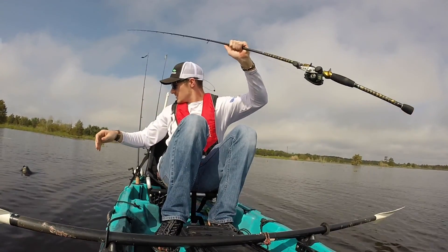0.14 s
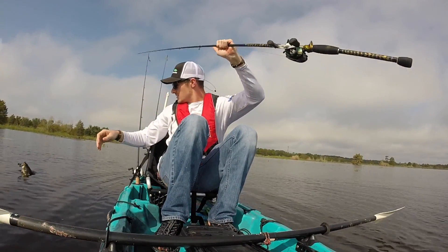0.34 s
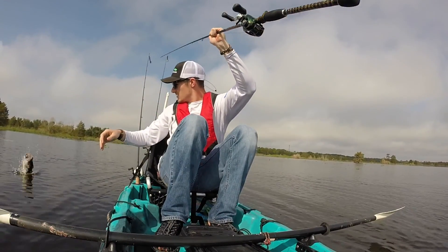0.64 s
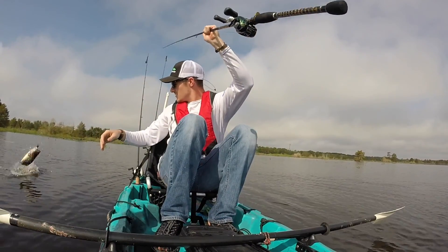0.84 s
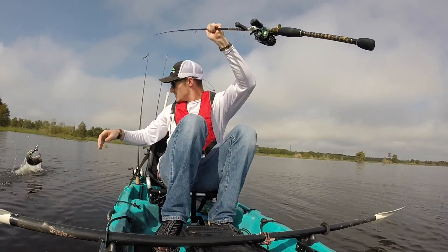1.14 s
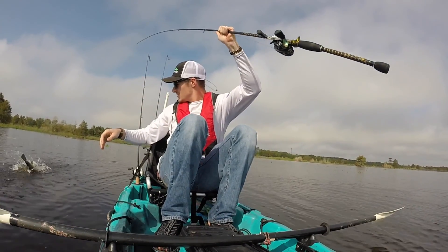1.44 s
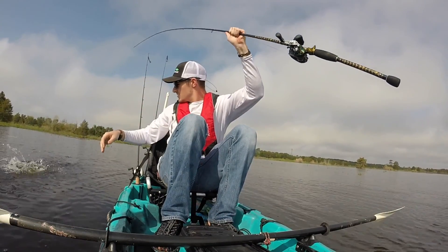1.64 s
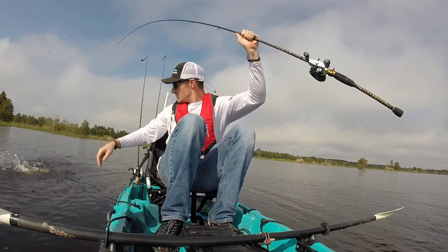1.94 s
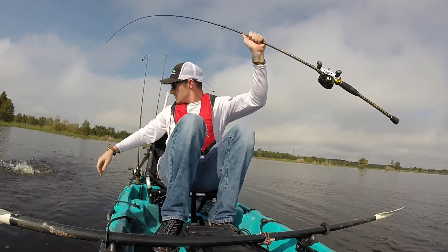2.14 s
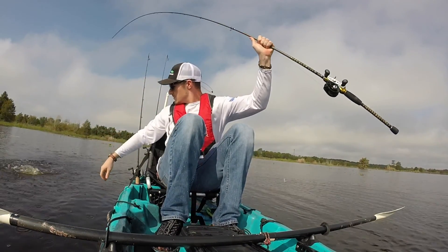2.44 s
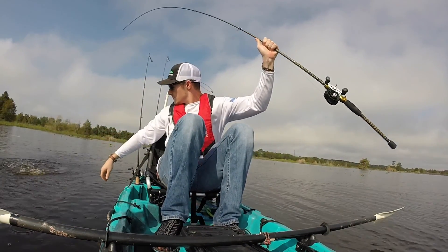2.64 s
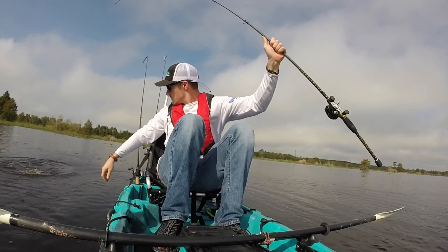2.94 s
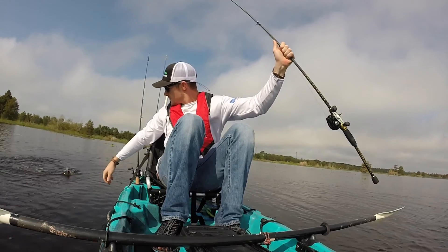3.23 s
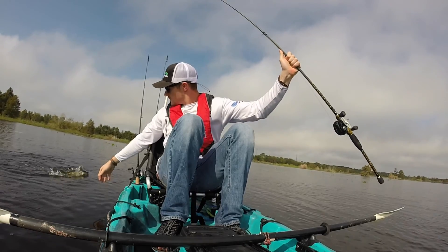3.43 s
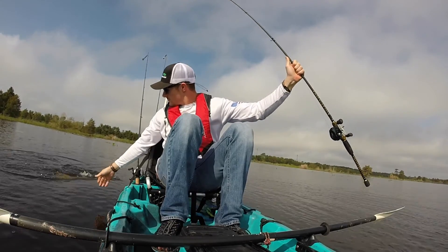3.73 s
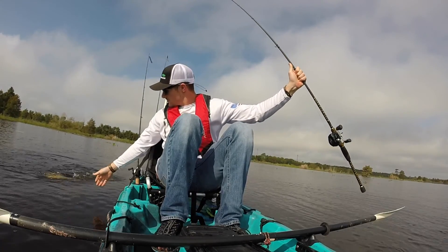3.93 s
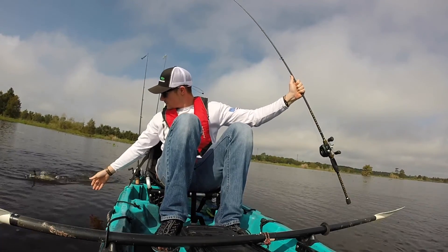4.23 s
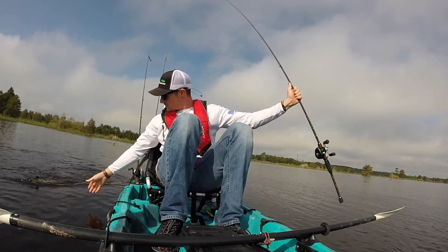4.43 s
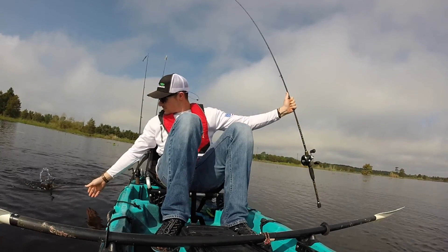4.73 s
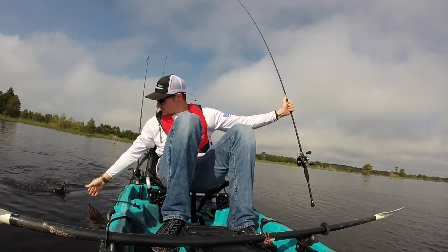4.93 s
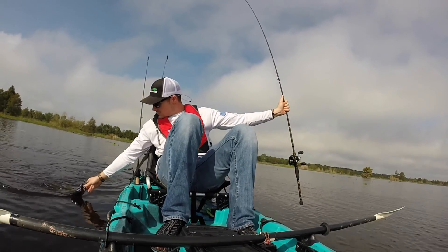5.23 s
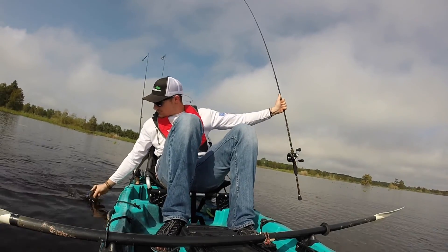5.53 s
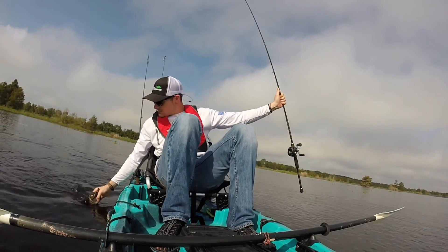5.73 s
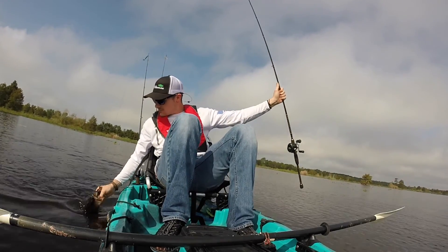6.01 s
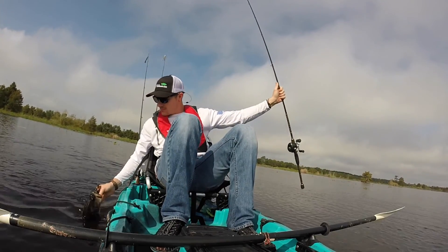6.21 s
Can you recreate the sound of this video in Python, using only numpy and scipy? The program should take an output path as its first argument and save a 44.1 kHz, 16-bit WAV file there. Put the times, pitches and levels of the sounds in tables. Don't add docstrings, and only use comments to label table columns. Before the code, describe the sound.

Outdoors on a lake, close to the water, a fish thrashes beside a small boat. First come slowed, low-pitched bloops, thumps and thick sloshing spray, strongest early and around two seconds. Afterwards, natural-speed rolling gives one sharp, hollow plop and lighter splashes, then sparse little blips. Soft lumpy wind rumble on the microphone and a thin hiss continue underneath.

```python
import sys
import numpy as np
from scipy import signal
from scipy.io import wavfile

SR = 44100
rng = np.random.default_rng(int(sys.argv[2]) if len(sys.argv) > 2 else 0)


def nominal_scale(level):
    x = np.asarray(level, float) / 20
    return 10 ** x


def bounce(signal):
    frames = np.transpose(np.atleast_2d(signal))
    limited = np.clip(frames, -1, 1)
    pcm = np.round(limited * 32767).astype(np.int16)
    wavfile.write(sys.argv[1], SR, pcm)


N = 280910
SLOW_UNTIL_S = 2.936
LENGTH = N - round(SLOW_UNTIL_S * SR / 2)



def true_s(heard_s):
    return np.where(heard_s < SLOW_UNTIL_S, heard_s / 2, heard_s - SLOW_UNTIL_S / 2)


def speed_up(heard_s):
    return 2 if heard_s < SLOW_UNTIL_S else 1


def rms_one(x):
    return x / np.sqrt(np.mean(x ** 2) + 1e-20)


def in_time(rows):
    heard_s, *columns = np.transpose(rows)
    return [np.interp(np.arange(LENGTH) / SR, true_s(heard_s), column) for column in columns]


def at_hz(points, hz):
    points_hz, values = np.transpose(points)
    return np.interp(np.log(hz), np.log(points_hz), values)


def add(out, heard_s, sound):
    i = int(true_s(heard_s) * SR)
    out[i:i + len(sound)] += sound[:LENGTH - i]


def drift(rate_hz):
    r = np.exp(-80 * np.pi * rate_hz / SR)
    white = rng.standard_normal(LENGTH // 40 + 2002)
    slow = signal.lfilter([1], [1, -2 * r, r * r], white)[2000:]
    return np.interp(np.arange(LENGTH) / 40, np.arange(len(slow)), rms_one(slow))


def resonate(x, hz, width_hz):
    r = np.exp(-np.pi * width_hz / SR)
    zeros = np.array([1, 0, -1]) * (1 - r * r) / 2
    return signal.lfilter(zeros, [1, -2 * r * np.cos(2 * np.pi * hz / SR), r * r], x)


def grains(per_s, spread_db):
    sizes = nominal_scale(spread_db * np.minimum(rng.exponential(1, LENGTH), 5))
    signs = rng.choice([-1, 1], LENGTH)
    return sizes * signs * (rng.random(LENGTH) < per_s / SR) + 1e-18


def banded_noise(spectrum, patchy_db, flicker_hz):
    out, together = 0, drift(3.0)
    edges_hz = 18 * 2 ** np.arange(0, 10.1, .5)
    white = rng.standard_normal((2, LENGTH))
    for k, (low, high) in enumerate(zip(edges_hz, edges_hz[1:])):
        sos = signal.butter(2, [low, high], "band", fs=SR, output="sos")
        band = signal.sosfilt(sos, white[k % 2])
        level_db = at_hz(spectrum, np.sqrt(low * high))
        wander_db = patchy_db * (0.61 * together + drift(flicker_hz))
        out = out + band * nominal_scale(level_db + wander_db)
    return rms_one(out)


# (frequency [Hz], density [dB per Hz])
RUMBLE_SPECTRUM = [(20, -6), (50, 4.5), (125, 6), (220, -1), (330, -14.5), (600, -41.5), (2500, -91)]
HISS_SPECTRUM = [(200, 4.5), (500, 4), (850, -3), (1250, -13.5), (2100, -11.5), (5000, -18.5),
                 (10500, -28.5), (14000, -28)]
# (time [s], swell [dB])
SWAYS = [(0.01, 7.5), (0.6, -2), (0.84, -11.5), (0.92, 7.5), (0.989, -2), (1.2, -1.5), (1.45, 1), (1.6, -5),
         (1.67, 6.5), (2.02, 5.5), (2.22, -2), (2.31, 7.5), (3.42, 5), (2.88, 0.5), (4.42, -0.5),
         (4.95, -1), (5.82, 2.5), (6.02, -4), (5.04, 1)]
RUMBLE_DB, HISS_DB, SWAY_HALF_WIDTH_S = -41.0, -51, .03


def wind():
    t = np.arange(LENGTH) / SR
    gust_db = RUMBLE_DB
    for heard_s, swell_db in SWAYS:
        gust_db = gust_db + swell_db * np.exp(-((t - true_s(heard_s)) / SWAY_HALF_WIDTH_S) ** 2)
    rumble = nominal_scale(gust_db) * banded_noise(RUMBLE_SPECTRUM, patchy_db=2.0, flicker_hz=18.5)
    return rumble + nominal_scale(HISS_DB) * banded_noise(HISS_SPECTRUM, patchy_db=.05, flicker_hz=25.0)


# (pitch [Hz], level [dB])
BUBBLE_SIZES = [(250, -10.5), (400, -10.5), (700, 0.5), (1000, -8), (1500, -12.5), (2400, -18)]


def slosh(level_db):
    clicks = grains(1800 * nominal_scale(2.5 * drift(12)), spread_db=2.8)
    size_index = rng.integers(0, 24, LENGTH)
    out = 0
    for k, hz in enumerate(np.geomspace(250, 2400, 24)):
        own_clicks = clicks * (size_index == k) + 1e-18
        rung = resonate(resonate(own_clicks, hz, hz / 7.3), hz, hz / 2.4)
        out = out + nominal_scale(at_hz(BUBBLE_SIZES, hz)) * np.sqrt(1000 / hz) * rung
    return nominal_scale(level_db) * rms_one(out)


# (time [s], peak [dB], tilt to treble [dB])
LEAP_SLAPS = [(0.4893, -34, 3), (0.5965, -28, 6), (0.6594, -42.5, -6), (0.7303, -27, 2.5), (0.746, -29, -2),
              (0.791, -39.5, -3), (0.8744, -32.5, 6), (0.8986, -18.5, -4), (0.925, -22, 7),
              (0.9794, -42, 11.5), (1.1006, -40, 7), (1.1376, -39, 10), (1.1869, -51, 11), (1.2491, -42, 9),
              (1.3414, -42.5, -11.5), (1.3565, -30, 4.5), (1.437, -33, -8), (1.643, -27, 3),
              (1.653, -24.5, 5), (1.6588, -27.5, -7), (1.7194, -40, 8), (1.737, -38, -2),
              (1.7983, -34.5, 1), (1.9555, -55.5, -20), (2.0258, -43.5, -11), (2.125, -44, -5),
              (2.1809, -44, -1), (2.296, -44, -5), (2.46, -45, -4)]
# (time [s], peak [dB])
ROLL_SLAPS = [(3.376, -38), (3.396, -34), (3.405, -34), (3.4466, -33), (3.4826, -37), (3.5344, -37),
              (3.622, -31), (3.631, -32), (3.6444, -43), (3.7212, -38), (3.583, -34), (3.66, -44),
              (3.7607, -36.5), (3.8904, -35), (3.936, -36), (4.1704, -37.5), (4.279, -36.5), (4.3216, -40),
              (4.334, -38), (4.6294, -47), (4.655, -46), (4.8, -40), (4.83, -43), (4.9432, -41),
              (5.4101, -42), (5.5698, -38)]
SLAP_LENGTH_S = 0.051


def slaps():
    dull, bright = np.zeros(LENGTH), np.zeros(LENGTH)
    t = np.arange(int(SLAP_LENGTH_S * SR))
    for heard_s, db, tilt_db in LEAP_SLAPS + [(s, db, 0) for s, db in ROLL_SLAPS]:
        onset = 1 - np.exp(-t * speed_up(heard_s) / (0.0011 * SR))
        burst = nominal_scale(db - 4.5 - 75 * t / len(t)) * onset
        add(dull, heard_s, nominal_scale(-tilt_db) * burst)
        add(bright, heard_s, nominal_scale(tilt_db) * burst)
    return dull, bright


# (frequency [Hz], width [Hz], level [dB])
LEAP_SPRAY = [(1800, 980, -4), (3352, 230, -12), (4497, 350, -8.5), (4770, 2000, -10.5),
              (5980, 1300, -16.5), (7570, 330, -22.5), (11060, 2300, -20.5)]
ROLL_SPRAY = [(1100, 830, -6.5), (1754, 500, -1), (2095, 460, -4.5), (3370, 650, -9), (5500, 3000, -19)]
BIG_DROPS_PER_S, BIG_DROPS_SHARE = 450, .55


def spray(level_db):
    stir = nominal_scale(level_db - 5.0)
    dull, bright = slaps()
    big = BIG_DROPS_SHARE * rms_one(grains(BIG_DROPS_PER_S, spread_db=2.0))
    in_leap = np.arange(LENGTH) < N - LENGTH
    out = 0
    for modes, heard, split_hz in (LEAP_SPRAY, in_leap, 5000), (ROLL_SPRAY, ~in_leap, 3000):
        for hz, width_hz, db in modes:
            patches = nominal_scale(3.2 * drift(45))
            slap = bright if hz > split_hz else dull
            fine = rms_one(grains(4000, spread_db=0.0))
            drops = (big + fine) * (stir * patches + slap) * heard
            rung = resonate(resonate(drops + 1e-18, hz, width_hz), hz, 1.43 * width_hz)
            out = out + nominal_scale(db) * np.sqrt(3000 / width_hz) * rung
    return out


def pocket(hz, cycles, rise_octaves):
    turns = np.arange(int(cycles / hz * SR)) * hz / SR
    climbing_hz = hz * 2 ** (rise_octaves * 3 * turns / cycles)
    phase = 2 * np.pi * np.cumsum(climbing_hz) / SR
    return nominal_scale(-60 * turns / cycles) * (1 - np.exp(-turns / 0.26)) * np.sin(phase)


def ring_each(rows, cycles, rise_octaves):
    out = np.zeros(LENGTH)
    for heard_s, db, hz in rows:
        add(out, heard_s, nominal_scale(db) * pocket(hz * speed_up(heard_s), cycles, rise_octaves))
    return out


# (time [s], peak [dB], pitch [Hz])
DROPLETS = [
    (.462, -39.5, 5960),
    (1.099, -38, 4870),
    (1.34, -36.5, 5500),
    (5.408, -34.5, 11700),
]


def droplets():
    return ring_each(DROPLETS, 9.3, .01)


# (time [s], peak [dB], start [Hz], end [Hz], length [s])
GULPS = [(0.433, -56.5, 563, 906, 0.072), (1.285, -58, 805, 950, 0.012), (2.04, -39, 604, 693, 0.037),
         (3.298, -41.5, 498, 700, 0.033), (3.322, -57, 1930, 1980, .015), (3.369, -39, 425, 910, 0.023),
         (3.918, -40.5, 643, 702, 0.036), (3.942, -36, 246, 468, 0.048), (3.979, -40.5, 438, 1100, 0.032),
         (4.046, -41, 486, 953, 0.037), (4.185, -49, 683, 1100, 0.032)]


def gulps():
    out, waver = np.zeros(LENGTH), drift(150)
    for heard_s, db, start_hz, end_hz, length_s in GULPS:
        speed = speed_up(heard_s)
        count, i = int(length_s / speed * SR), int(true_s(heard_s) * SR)
        hz = np.geomspace(start_hz, end_hz, count) * speed * (1 + .03 * waver[i:i + count])
        tone = np.sin(2 * np.pi * np.cumsum(hz) / SR)
        add(out, heard_s, nominal_scale(db) * np.hanning(count) ** 0.24 * tone)
    return out


# (time [s], level [dB rms], first [Hz], last [Hz], length [s])
LEAP_PLUNGES = [(0.74, -26.5, 545, 410, 0.032), (0.757, -20.5, 259, 266, 0.021),
                (0.777, -24.5, 347, 218, 0.053), (0.876, -27, 257, 201, 0.019),
                (0.898, -38.5, 350, 197, 0.045), (0.947, -34, 347, 253, 0.039),
                (1.401, -42, 320, 297, 0.08), (1.434, -43, 1850, 1800, 0.014),
                (1.513, -36, 455, 410, 0.024), (1.531, -31, 328, 338, 0.048), (1.623, -23, 284, 227, 0.015),
                (1.644, -32, 512, 374, 0.045), (1.801, -41, 545, 505, .03), (1.87, -36, 270, 250, 0.067),
                (1.927, -35, 355, 400, 0.034), (1.954, -31, 435, 266, 0.044), (2.055, -35, 265, 194, 0.042),
                (2.298, -28, 306, 200, 0.0334), (2.335, -35.5, 338, 209, 0.063)]
TRICKLES = [
    (2.39, -68, 4570, 4340, 0.043),
    (2.423, -59.5, 3170, 3000, 0.042),
    (2.453, -59, 2280, 2600, 0.049),
    (2.698, -60.5, 1380, 1040, .09),
]
ROLL_PLUNGES = [(3.403, -43.5, 860, 830, 0.1), (3.534, -43, 686, 615, 0.031),
                (3.589, -39.5, 573, 680, 0.04), (3.612, -41, 647, 750, 0.023),
                (3.647, -34, 636, 444, 0.025), (3.702, -42, 730, 590, 0.043),
                (4.278, -35.5, 730, 560, 0.04), (4.279, -35, 322, 210, 0.054),
                (4.507, -44.5, 870, 710, 0.033), (4.616, -47, 680, 650, 0.08), (4.749, -46, 660, 575, 0.07),
                (4.814, -46, 715, 690, 0.051), (5.02, -50.5, 663, 650, 0.074),
                (5.935, -53, 800, 800, 0.057)]
SPREAD_OCTAVES, SPREAD_PER_OCTAVE_OF_SAG, TRICKLE_SPREAD_OCTAVES = 0.42, 0.36, 0.069


def plunges(count=22):
    rows = LEAP_PLUNGES + TRICKLES + ROLL_PLUNGES
    out, chance = np.zeros(LENGTH), rng.random((len(rows), count, 3))
    for row, draws in zip(rows, chance):
        heard_s, db, first_hz, last_hz, length_s = row
        speed = speed_up(heard_s)
        sag_octaves = abs(np.log2(first_hz / last_hz))
        spread = SPREAD_OCTAVES + SPREAD_PER_OCTAVE_OF_SAG * sag_octaves
        if row in TRICKLES:
            spread = TRICKLE_SPREAD_OCTAVES
        cloud = np.zeros(int((length_s / speed + .15) * SR))
        for k, (late, size, sign) in enumerate(draws):
            share = (k + late) / count
            middle_hz = speed * first_hz * (last_hz / first_hz) ** share
            hz = middle_hz * 2 ** (spread * (2 * size - 1))
            ring = pocket(hz, 10.7 + hz / 250, 0.034)[:int(.15 * SR)]
            i = int(share * length_s / speed * SR)
            cloud[i:i + len(ring)] += nominal_scale(-11.0 * share) * np.sign(sign - .5) * ring
        add(out, heard_s, nominal_scale(db) * cloud / np.std(cloud[:i + 1]))
    return out


POCKET_RISE_OCTAVES = .1
# (time [s], peak [dB], pitch [Hz])
PUSHES = [
    (.645, -30, 80),
    (.926, -18, 520),
    (1.246, -29, 85.6),
    (1.964, -12.5, 243),
    (1.976, -17.5, 150),
    (2.309, -15.5, 134),
    (2.338, -22, 94.3),
    (4.16, -29, 100),
    (4.283, -38, 203),
]


def pushes():
    return ring_each(PUSHES, 8.1, POCKET_RISE_OCTAVES)


# (time [s], peak [dB], pitch [Hz])
RINGING = [(0.538, -29.5, 452), (0.596, -29, 449), (0.731, -12.5, 416), (0.752, -12.5, 330),
           (0.777, -9, 335), (0.876, -28, 203), (0.901, -25, 183), (1.344, -31.5, 515), (1.397, -45, 360),
           (1.435, -22.5, 270), (1.531, -14.5, 317), (1.624, -16, 262), (1.805, -22.5, 520),
           (1.869, -32, 248), (2.029, -29, 202), (2.128, -32.5, 355), (2.269, -40, 334), (2.298, -18, 353),
           (2.408, -30, 293), (2.511, -32.5, 276), (2.606, -37, 260), (2.732, -38, 325), (2.838, -32, 295),
           (3.449, -27.5, 774), (3.487, -21, 564), (3.63, -35, 305), (4.28, -28.5, 350), (4.287, -25, 510),
           (4.766, -31.5, 558), (4.78, -31.5, 530)]
BURSTING = [(0.493, -33, 260), (0.656, -34.5, 395), (0.741, -8.5, 402), (0.952, -39, 363),
            (1.119, -23, 307), (1.246, -33, 144), (1.293, -37, 800), (1.935, -30, 645), (1.572, -19.5, 304),
            (1.624, -42, 151), (1.656, -15, 392), (1.924, -21.5, 320), (2.06, -17.5, 221), (3.3, -35, 513),
            (3.532, -30, 581), (3.59, -38, 580), (3.288, -37.5, 840), (3.631, -8.5, 702), (3.641, -13, 675),
            (3.679, -26.5, 530), (3.707, -34, 760), (2.06, -30, 630), (4.18, -39, 773), (4.749, -43, 834),
            (5.426, -36, 560), (5.452, -36.5, 820), (5.554, -33, 556), (5.626, -47, 320),
            (5.655, -34.5, 490), (5.728, -43, 323)]


def pockets():
    ringing = ring_each(RINGING, 26.7, POCKET_RISE_OCTAVES)
    return ringing + ring_each(BURSTING, 13.2, POCKET_RISE_OCTAVES)


# (frequency [Hz], share of blocks kept [0-1])
TOP_KEPT = [(12500, 1), (13200, .9), (14300, .78), (14800, .6), (15000, .2), (15400, .02)]
TOP_BAND_HZ = 172


def ragged_top(x, size=1024):
    hz, t, cells = signal.stft(x, SR, nperseg=size)
    band = (hz // TOP_BAND_HZ).astype(int)
    draws = rng.random((band[-1] + 1, len(t)))
    chance = np.repeat(draws, 3, axis=1)[band, :len(t)]
    below_top = hz < TOP_KEPT[-1][0]
    gain = (chance < at_hz(TOP_KEPT, hz + 1)[:, None]) * below_top[:, None]
    return signal.istft(cells * gain, SR, nperseg=size)[1][:len(x)]


def half_speed_start(x):
    half = N - LENGTH
    slow = signal.resample_poly(x, 2, 1)[:2 * half]
    return np.concatenate([slow, x[half:]])[:N]


# (time [s], slosh [dB], spray [dB])
STIR = [(0.0, -62, -67), (0.38, -55.5, -63.5), (0.7, -43.5, -42.5), (0.98, -38, -39), (1.22, -47.5, -44),
        (1.5, -37.5, -44.5), (1.88, -40.5, -44), (2.48, -45, -47), (2.85, -51, -77), (3.2, -58, -83),
        (3.39, -52, -54), (3.65, -50, -42), (3.85, -57.5, -57), (3.97, -54.5, -64), (4.54, -54, -63),
        (4.81, -53.5, -59), (5.22, -57, -65.5), (6.37, -60, -58)]


def scene():
    slosh_db, spray_db = in_time(STIR)
    water = slosh(slosh_db) + spray(spray_db) + droplets() + gulps()
    fish = plunges() + pushes() + pockets()
    return half_speed_start(ragged_top(wind() + water + fish))[None]


def top_cut(x):
    return signal.sosfilt(signal.butter(12, 15300, fs=SR, output="sos"), x)


def record(dry):
    return top_cut(dry)


dry = scene()
out = record(dry)
bounce(out)
```